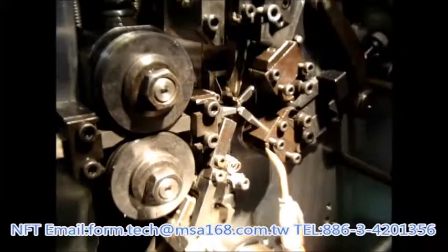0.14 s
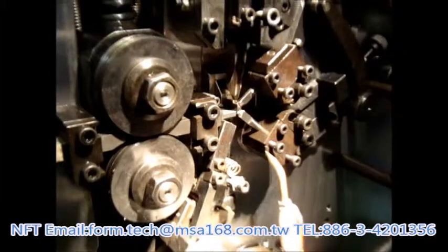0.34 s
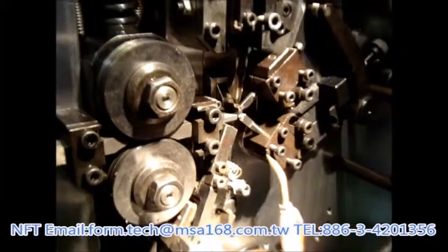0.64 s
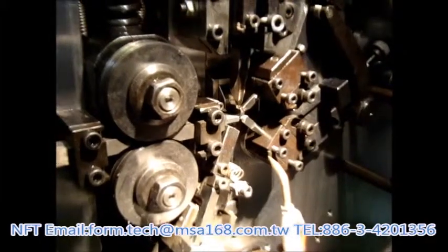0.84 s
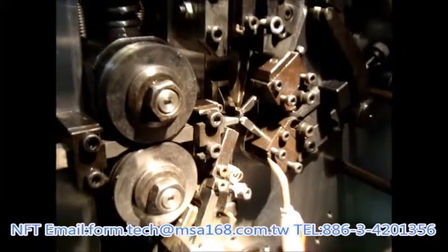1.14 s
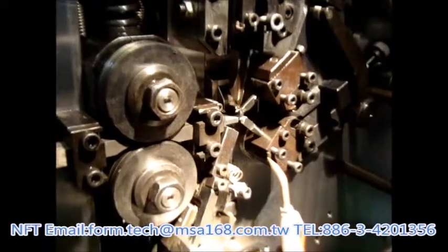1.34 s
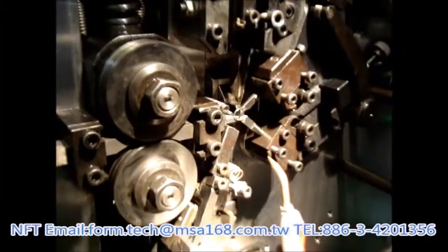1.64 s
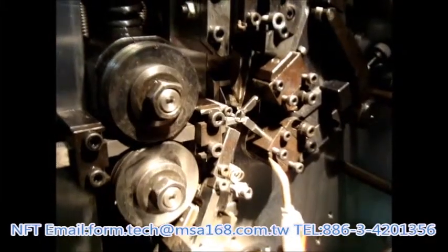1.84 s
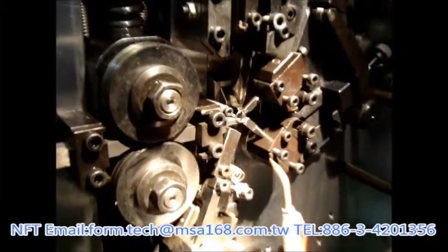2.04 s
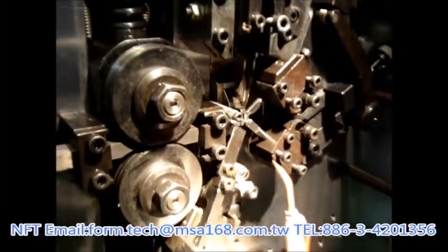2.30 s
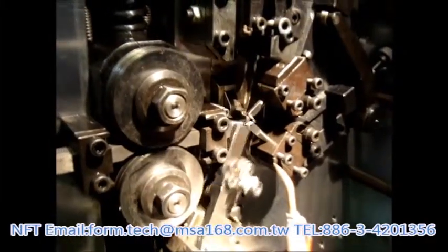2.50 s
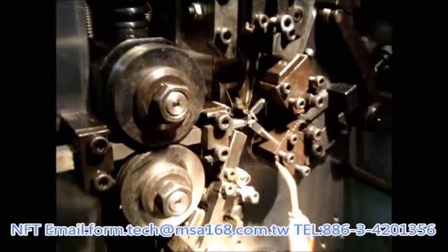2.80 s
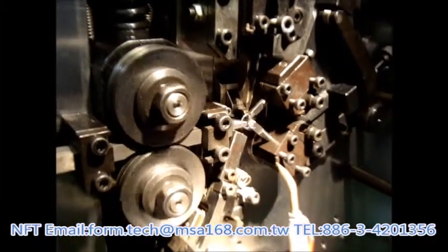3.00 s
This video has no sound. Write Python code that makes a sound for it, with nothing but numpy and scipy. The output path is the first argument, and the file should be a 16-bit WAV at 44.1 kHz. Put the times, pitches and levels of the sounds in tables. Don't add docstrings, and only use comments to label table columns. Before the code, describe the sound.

Close mono recording of a coiling machine: continuous gear noise and wavering thin whine, light ticks, a hard slide slam, a scraping multi-stroke wire cut, then groaning drive and stronger hiss, the blows distorted.

```python
import sys
import numpy as np
from scipy import signal
from scipy.fft import rfft, irfft, next_fast_len
from scipy.io import wavfile
from scipy.ndimage import uniform_filter1d, map_coordinates

SR = 44100
rng = np.random.default_rng(int(sys.argv[2]) if len(sys.argv) > 2 else 0)


def to_linear_factor(level_db):
    exponent = np.asarray(level_db, float) / 20
    return 10 ** exponent


def wav_out(sig):
    wavfile.write(sys.argv[1], SR, np.round(np.clip(np.atleast_2d(sig).T, -1, 1) * 32767).astype(np.int16))


N = 139356
T = np.arange(N) / SR


def unit(x):
    return x / np.sqrt(np.mean(np.abs(x) ** 2) + 1e-20)


def along(points, hz):
    point_hz, value = np.transpose(points)
    return np.interp(np.log(hz + 1), np.log(point_hz + 1), value)


def curves(rows):
    s, *columns = np.transpose(rows)
    return [np.interp(T, s, column) for column in columns]


def wobble(rate):
    knots = rng.standard_normal(int(N * rate / SR) + 4)
    return map_coordinates(knots, [T * rate])


def filtered(x, response):
    m = next_fast_len(N + SR // 2)
    gain = response(np.fft.rfftfreq(m, 1 / SR))
    return irfft(rfft(x, m) * gain, m)[..., :N]


def rush(spectrum, patchy_db):
    z = signal.stft(rng.standard_normal(N), nperseg=512)[2]
    patches = uniform_filter1d(rng.standard_normal(z.shape), 5, 0)
    patches = unit(uniform_filter1d(patches, 6, 1))
    noise = signal.istft(z * to_linear_factor(patchy_db * patches), nperseg=512)[1][:N]
    return unit(filtered(noise, lambda hz: to_linear_factor(along(spectrum, hz))))


def tone(hz):
    return np.sin(2 * np.pi * np.cumsum(hz) / SR)


def fuzzy(hz, wide_hz):
    slow = filtered(rng.standard_normal((2, N)), lambda f: 1 / (1 + (2 * f / wide_hz) ** 2))
    carrier = np.exp(2j * np.pi * np.cumsum(hz * np.ones(N)) / SR)
    return unit(np.real((slow[0] + 1j * slow[1]) * carrier))


def hits(rows, modes):
    # hz, level_db
    crack_colour = [(100, -45), (600, -12.5), (2000, 2.5), (5000, -0.5), (10000, -7)]
    ring, crack = np.zeros(N + SR), np.zeros(N + SR)
    t = T[:SR // 3]
    for s, ring_db, crack_db, crack_t60 in rows:
        here = slice(round(s * SR), round(s * SR) + len(t))
        for hz, db, t60 in modes:
            level_luck, pitch_luck = rng.standard_normal(2)
            decay = to_linear_factor(ring_db + db + 0.5 * level_luck - 60 * t / max(t60, .01))
            ring[here] += decay * np.sin(2 * np.pi * hz * (1 + 0.0029 * pitch_luck) * t)
        crack[here] += to_linear_factor(crack_db - 60 * t / max(crack_t60, .01))
    return ring[:N] + crack[:N] * rush(crack_colour, patchy_db=1.5)


def drone():
    # hz, level_db
    gear_colour = [(22, -28), (60, -25.5), (180, -10.5), (600, -6.5), (1800, -15), (3700, -12), (5000, -19),
                   (7200, -17.5), (10300, -27.5)]
    # hz, width_hz, level_db
    frame_modes = [(189.7, 25, -36), (212.7, 12, -40.5), (534.7, 39, -33.5), (564, 42, -35.5),
                   (6720, 130, -43), (2333, 60, -48), (604.5, 46, -39), (731.6, 10, -39), (1542, 21, -39.5),
                   (821, 47, -39)]
    # time_s, effort_db
    effort = [(0, -1), (.2, 0), (1.3, 1), (1.5, 2.5), (2.2, -0.5), (2.4, 5), (2.5, -1), (2.82, -11.5),
              (2.92, 0.5), (3.16, -4)]
    effort_db, = curves(effort)
    gears = to_linear_factor(-21.5 + 0.76 * wobble(6.68) + 1.0 * wobble(60)) * rush(gear_colour, patchy_db=0.6)
    hums = sum(to_linear_factor(db) * fuzzy(hz, wide_hz) for hz, wide_hz, db in frame_modes)
    return to_linear_factor(0.23 * effort_db) * gears + to_linear_factor(effort_db) * hums


def return_drive():
    # time_s, level_db
    groan_level = [(0, -64), (2.5, -55), (2.6, -28.5), (2.75, -28), (2.87, -23.5), (3.0, -29), (3.08, -27),
                   (3.16, -60)]
    # time_s, pitch_hz, level_db
    pickup = [
        (0, 608, -60),
        (2.85, 599.5, -51.5),
        (2.98, 620, -31.5),
        (3.08, 652, -24),
        (3.16, 658, -29),
    ]
    groan_db, = curves(groan_level)
    groan = to_linear_factor(groan_db) * to_linear_factor(1.8 * wobble(12.1)) * tone(413 + 3.6 * wobble(8))
    pickup_hz, pickup_db = curves(pickup)
    return groan + to_linear_factor(pickup_db) * fuzzy(pickup_hz, 8.8)


def whine():
    # time_s, pitch_hz, level_db, core_over_haze_db
    wire_path = [(0, 4120, -33, 0), (.15, 4120, -34, -2), (.2, 4114, -33, 7), (.27, 4114, -33, 6),
                 (.32, 4110, -33, -3), (.48, 3990, -30.5, -8), (.74, 3830, -32, -5), (.88, 3605, -35, 2),
                 (.97, 3555, -36, 5), (1.15, 3585, -36, 5), (1.66, 3598, -35, 4.5), (1.8, 3596, -37, -2),
                 (1.83, 4020, -35, -3), (2.33, 4160, -32, -2), (2.45, 4100, -40, -6), (2.8, 3885, -36, 1),
                 (3.07, 3800, -33, -8), (3.11, 3950, -31, 1)]
    hz, db, core_db = curves(wire_path)
    haze = fuzzy(hz, 340) + to_linear_factor(-11) * fuzzy(2 * hz, 220)
    core_hz = hz + 14 * wobble(12)
    core = tone(core_hz) + .45 * fuzzy(core_hz, 60)
    return to_linear_factor(db) * (haze + to_linear_factor(core_db + 1.6 * wobble(20)) * core)


def air_jet():
    # time_s, level_db
    air_flow = [(0, -18), (.3, -17), (.47, -22), (.65, -38), (.9, -42), (1.1, -29.5), (2.2, -26),
                (2.45, -24.5), (2.75, -19.5), (3.16, -13.5)]
    # hz, level_db
    hiss_colour = [(700, -43), (1300, -15), (2500, -6.5), (4200, -7.5), (6000, -5.5), (8900, -8.5),
                   (10300, -15.5)]
    flow_db, = curves(air_flow)
    return to_linear_factor(flow_db + 0.37 * wobble(25.05)) * rush(hiss_colour, patchy_db=0.5)


def slides():
    # time_s, level_db
    slide_load = [(0, -34), (.5, -37.5), (1.0, -51), (1.45, -27.5), (2.2, -26.5), (2.4, -27), (2.6, -26.5),
                  (2.9, -23.5), (3.16, -19.5)]
    # hz, level_db
    rub_colour = [(290, -32), (500, 4.5), (642, -1.5), (701, 5), (1360, 0.5), (2470, 6.5), (5000, -25),
                  (6500, -30), (11000, -120)]
    load_db, = curves(slide_load)
    return to_linear_factor(load_db + 0.93 * wobble(16)) * rush(rub_colour, patchy_db=1.1)


def slide_slam():
    # time_s, ring_db, crack_db, crack_t60_s
    contacts = [
        (1.6812, -8, -8.5, 0.12),
        (1.692, -13, -17, 0.06),
    ]
    # hz, level_db, t60_s
    slide_modes = [(211.7, -13.5, 1.17), (978, -8.5, 0.31), (1064, -2, 0.066), (1154, 1.5, 0.038),
                   (1680, -11.5, .06), (2160, 0.5, 0.026), (2325, 0.5, .025), (3250, -14, 0.08),
                   (4300, -10, .04), (5930, -11, .045), (6400, -5.5, 0.058), (7400, -10, 0.09),
                   (8240, -12.5, 0.064)]
    after_s = np.clip(T - 1.6828, 0, None)
    rise = 1 - np.exp(-(after_s / 0.015) ** 2)
    thump = to_linear_factor(-0.5 - 60 * after_s / 0.17) * rise * np.sin(2 * np.pi * 211 * after_s)
    return thump + hits(contacts, slide_modes)


def cutter():
    # hz, level_db
    run_up_colour = [(40, -21), (95, 0), (300, -5), (580, 3), (900, -7), (1300, -24), (3000, -63)]
    # time_s, level_db
    skid_level = [(0, -82), (2.418, -60), (2.4205, -16), (2.424, -11), (2.433, -12), (2.46, -17),
                  (2.495, -24), (2.5, -60), (3.16, -82)]
    # hz, level_db
    skid_colour = [(700, -31), (2000, -6), (4000, 0), (7000, 0), (10300, -4.5)]
    # time_s, level_db
    cutting_force = [(0, -81), (2.421, -61), (2.424, -17), (2.431, -16.5), (2.435, -12.5), (2.445, -10.5),
                     (2.462, -13), (2.475, -13.5), (2.495, -14.5), (2.503, -19), (2.55, -20), (2.62, -26),
                     (2.7, -70), (3.16, -80)]
    # hz, level_db
    shear_colour = [(150, -30), (800, -7), (1400, 0.5), (2500, 2.5), (4500, -5.5), (7000, -4),
                    (10300, -11.5)]
    # time_s, ring_db, crack_db, crack_t60_s
    strokes = [
        (2.4230, -26, -12, .02),
        (2.4322, -14, -14, 0.038),
        (2.444, -14, -15, 0.047),
        (2.456, -19, -19, .03),
        (2.468, -17, -17, .03),
        (2.480, -13, -16, 0.043),
        (2.5223, -14, -11, 0.04),
        (2.530, -23, -21, .05),
    ]
    # hz, level_db, t60_s
    blade_modes = [(830, -11, 0.14), (960, -6, 0.15), (1220, -9, 0.21), (1917, -12, .1),
                   (2170, -10.5, 0.077), (2432, -9, 0.09), (2655, -8.5, 0.16), (2886, -6, 0.14),
                   (3170, -11, 0.11), (3720, -9, .1), (4350, -15, .06), (6010, -8.5, .06), (6470, -3, 0.04),
                   (7100, -3, 0.045)]
    run_up_swell = to_linear_factor(-19.5) * np.exp(-((T - 2.37) / 0.057) ** 2)
    run_up = run_up_swell * rush(run_up_colour, patchy_db=-2.5)
    skid_db, = curves(skid_level)
    skid = to_linear_factor(skid_db + 1.5 * wobble(200)) * rush(skid_colour, patchy_db=1.2)
    force_db, = curves(cutting_force)
    shear = to_linear_factor(force_db + 1.2 * wobble(150)) * rush(shear_colour, patchy_db=1.2)
    return run_up + skid + shear + hits(strokes, blade_modes)


def chatter():
    # start_s, length_s, peak_db, pitch_hz, glide_hz
    squeaks = [(1.7065, .0175, -8, 5240, 0), (1.7255, .008, -9, 5240, 0), (1.6815, .009, -10, 4145, 0),
               (1.692, .014, -11, 4190, 0), (2.316, .009, -15, 4150, 0), (2.433, .014, -8, 2060, 0),
               (2.462, .012, -13, 1950, 80), (2.482, .016, -9, 2060, -130), (2.524, .013, -11, 2050, -30),
               (2.404, .009, -26, 4200, 0), (2.543, .022, -14, 770, 90)]
    wander_hz = 25 * wobble(150)
    out = np.zeros(N)
    for s, length_s, db, hz, glide_hz in squeaks:
        progress = np.clip((T - s) / length_s, 0, 1)
        gate = np.clip(np.minimum(T - s, s + length_s - T) / 0.0021, 0, 1)
        out += to_linear_factor(db - 4 * progress) * gate * tone(hz + wander_hz + glide_hz * progress)
    return out


def cam_ticks():
    # time_s, ring_db, crack_db, crack_t60_s
    contacts = [
        (.6445, -18, -26, 0.037),
        (1.4896, -14, -26, .04),
        (1.6168, -10.5, -21, 0.05),
        (2.273, -19, -22, .03),
    ]
    # hz, level_db, t60_s
    cam_modes = [(3850, -1.5, 0.02), (4230, -5, .025), (4790, -6, 0.031), (6330, -10, .03),
                 (9240, -16, 0.041)]
    return hits(contacts, cam_modes)


def jolts():
    # start_s, level_db, length_s
    pushes = [
        (1.686, -22, 0.0071),
        (2.417, -25, 0.0043),
    ]
    out = np.zeros(N)
    for s, db, length_s in pushes:
        v = np.clip(T - s, 0, None) / length_s
        out += to_linear_factor(db) * v * np.exp(1 - v)
    return out


def gaps(x):
    # start_s, end_s
    thinned_spans = [
        (2.49, 2.521),
        (1.698, 1.716),
        (1.738, 1.752),
    ]
    hz, t, z = signal.stft(x, SR, nperseg=128)
    hz = hz[:, None]
    luck = np.kron(rng.random((40, len(t) // 5 + 1)), np.ones((2, 5)))[:len(hz), :len(t)]
    thinned_time = sum((t > start) & (t < end) for start, end in thinned_spans) > 0
    share = np.where(thinned_time & (hz > 5700), .55, .07)
    lost = (luck < share) & (hz > 4700)
    return signal.istft(z * np.where(lost, to_linear_factor(-30), 1), SR, nperseg=128)[1][:, :N]


def treble_drops(x):
    # start_s, end_s, above_hz, level_db
    drop_spans = [
        (2.400, 2.419, 4700, -25),
    ]
    for start, end, above_hz, db in drop_spans:
        lost = np.clip(np.minimum(T - start, end - T) / 0.0016, 0, 1) * (1 - to_linear_factor(min(db, 0)))
        x = x - lost * filtered(x, lambda f: f > above_hz)
    return x


def splits(x):
    # time_s, centre_hz
    refills = [(0, 7400), (.23, 8300), (.39, 6300), (.51, 6300), (.83, 4700), (1.3, 6730), (1.345, 5770),
               (1.39, 6000), (1.415, 6360), (1.44, 8800), (2.365, 7700), (2.575, 6720), (2.645, 5800),
               (3.04, 4700)]
    hz, t, z = signal.stft(x, SR, nperseg=512)
    hz = hz[:, None]
    refilled = sum((abs(t - s) < .017) & (abs(hz / centre - 1) < .1) for s, centre in refills) > 0
    power = uniform_filter1d(abs(z) ** 2, size=15, axis=1)
    power = uniform_filter1d(power, size=5, axis=2)
    fresh = unit(signal.stft(rng.standard_normal(x.shape), nperseg=512)[2])
    z = np.where(refilled, np.sqrt(abs(power)) * fresh, z)
    return signal.istft(z, nperseg=512)[1][:, :N]


def splatter():
    # start_s, level_db, length_s
    bursts = [(1.6775, -62, .002), (1.6812, -39, .0026), (1.684, -63, .005), (2.4232, -50, .001),
              (2.4352, -39, .001), (2.4438, -35, .001), (2.4485, -48, .001), (2.436, -58, .016),
              (2.452, -63, .014), (0, -50, .002), (3.1585, -40, .002)]
    # hz, level_db
    spray_colour = [(9800, -60), (10500, 0), (13000, -2), (15400, -6), (15900, -60)]
    gate = np.zeros(N)
    for s, db, length_s in bursts:
        gate += to_linear_factor(db) * np.clip(np.minimum(T - s, s + length_s - T) / .0004, 0, 1)
    return gate * rush(spray_colour, patchy_db=4)


def scene():
    machine = drone() + return_drive() + whine() + air_jet() + slides()
    blows = slide_slam() + cutter() + chatter() + cam_ticks() + jolts()
    return np.tile(machine + blows, (2, 1))


def low_pass(x):
    return signal.sosfilt(signal.butter(12, 15830, fs=SR, output="sos"), x)


def record(dry):
    knee = 14
    x = dry / (1 + np.abs(dry / .84) ** knee) ** (1 / knee)
    x = treble_drops(gaps(x))
    x = filtered(x, lambda f: np.clip((10270 - f) / 250, 0, 1))
    mix = np.clip(splits(x) + splatter(), -.995, .995)
    return low_pass(mix)


dry = scene()
out = record(dry)
wav_out(out)
```